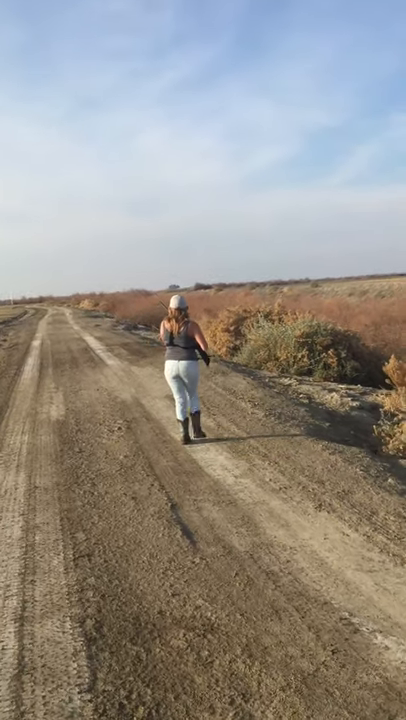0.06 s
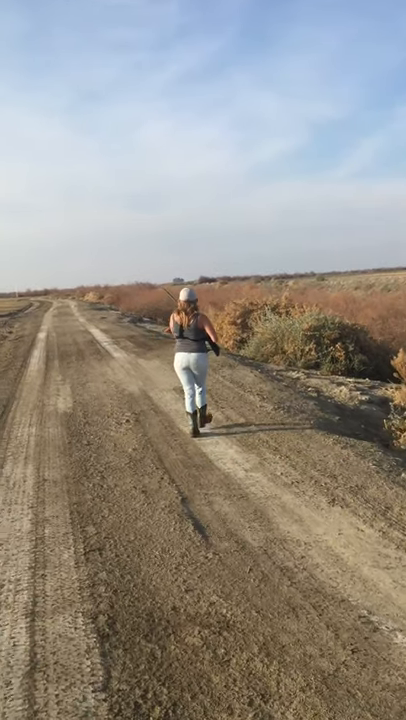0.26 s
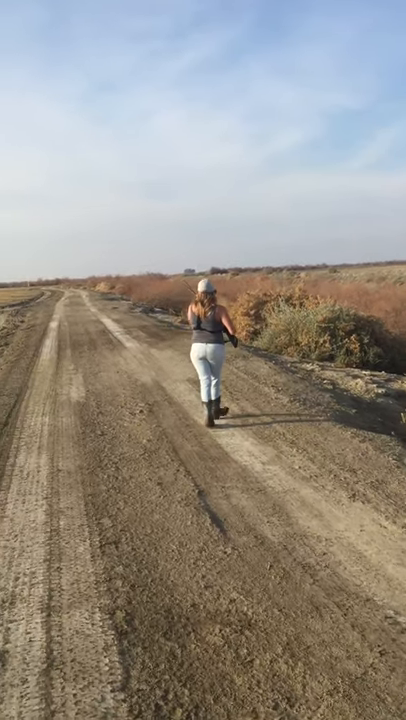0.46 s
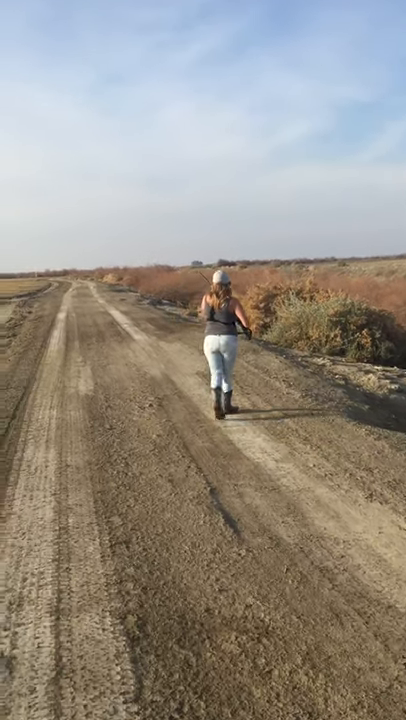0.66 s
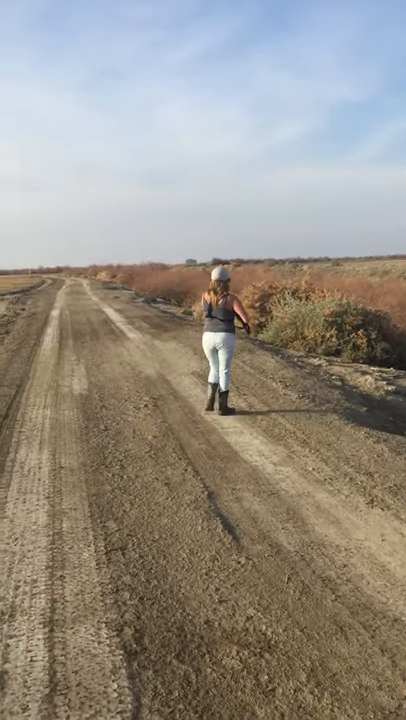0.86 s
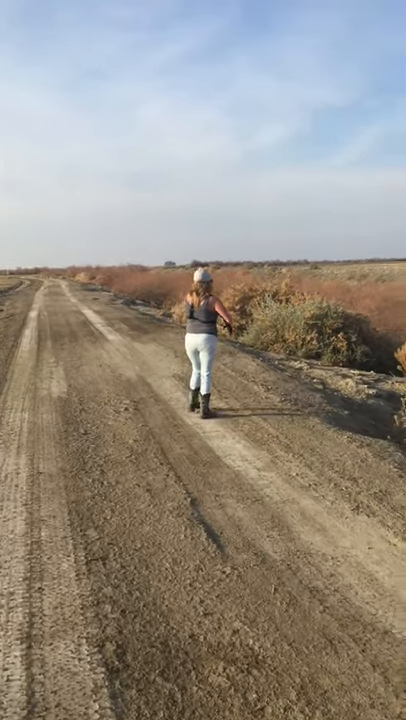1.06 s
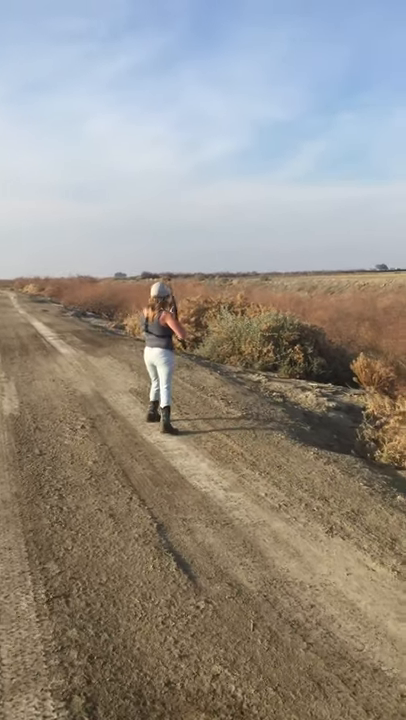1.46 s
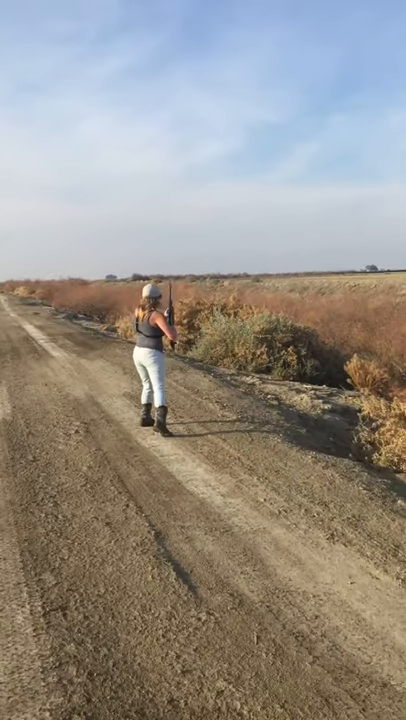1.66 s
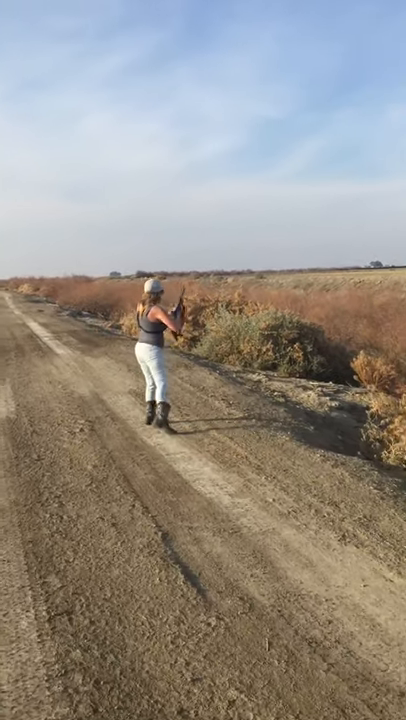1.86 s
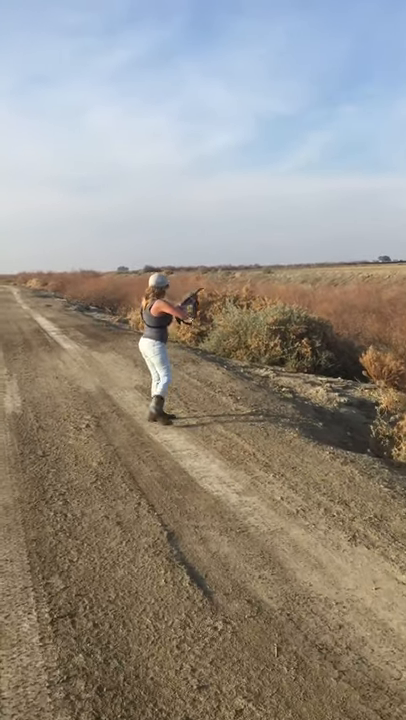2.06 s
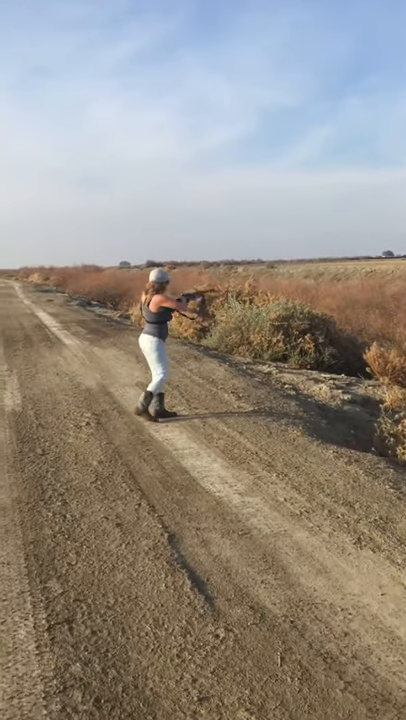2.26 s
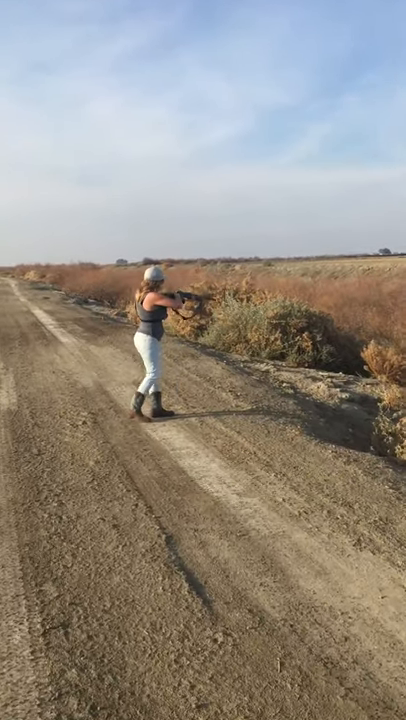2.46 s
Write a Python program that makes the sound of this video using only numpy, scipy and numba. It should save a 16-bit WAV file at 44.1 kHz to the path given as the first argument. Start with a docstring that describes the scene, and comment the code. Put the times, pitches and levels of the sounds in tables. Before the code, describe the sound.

Wind rumbles on a hand-held microphone outdoors, building quickly and buffeting hardest with low pops from about 0.2 to 0.6 seconds. It eases, thumps again near 1.2 seconds, then sinks to a soft low flutter until the end. Faint boot scuffs on dirt and dull handling rustles lie underneath in a quiet steady hiss, with light clicks around 1.0, 1.3 and 2.2 seconds.

```python
"""Wind on a hand-held microphone

On a dirt track in open country one gust rumbles and buffets the microphone's port, then sinks to a
low flutter; the harder it blows, the finer its eddies and the brighter the sound. Faint scuffs of
boots, dull handling rustles, a few light clicks and one far chirp sit in a steady hiss."""
import sys
import numpy as np
from scipy import signal
from scipy.fft import rfft, irfft
from scipy.io import wavfile
from scipy.ndimage import uniform_filter1d
from numba import njit

SR = 44100
rng = np.random.default_rng(int(sys.argv[2]) if len(sys.argv) > 2 else 0)


def wav_record(signal):
    """Record a signal, one row per channel, as 16-bit PCM in the file named by sys.argv[1]."""
    frames = np.transpose(np.atleast_2d(signal))
    bounded = np.clip(frames, -1, 1)
    # unit amplitude maps onto the largest positive 16-bit level
    quanta = np.round(bounded * 32767).astype(np.int16)
    wavfile.write(sys.argv[1], SR, quanta)


N = 114660


def undb(db):
    """Amplitude ratio of a level in decibels."""
    return 10 ** (np.asarray(db) / 20)


def unit(x):
    """Normalisation to rms 1."""
    return x / np.sqrt(np.mean(x ** 2))


def smooth(x, seconds):
    """Two running means in cascade form a triangular window."""
    size = max(int(seconds * SR), 1)
    return uniform_filter1d(uniform_filter1d(x, size), size)


@njit
def lowpass(x, hz):
    """Two integrators in a feedback loop form a low-pass whose corner can move every sample."""
    y, band_state, low_state = np.empty(len(x)), 0., 0.
    for i in range(len(x)):
        gain = np.tan(np.pi * hz[i] / SR)
        band = (band_state + gain * (x[i] - low_state)) / (1 + gain * (gain + np.sqrt(2.)))
        y[i] = low_state + gain * band
        band_state, low_state = 2 * band - band_state, 2 * y[i] - low_state
    return y


def band_noise(hz, octaves):
    """Band-limited noise centred on hz, rms 1."""
    edges = np.minimum(hz * 2 ** (np.array([-.5, .5]) * octaves), SR / 2 - 100)
    band = signal.butter(2, edges, "band", fs=SR, output="sos")
    return unit(signal.sosfilt(band, rng.standard_normal(N)))


def hiss():
    """Open air and the microphone set a floor of stationary broadband noise."""
    # Spectrum of the hiss. Each row: frequency in Hz, relative spectral density in dB.
    spectrum = [(30, -14.5), (120, 7), (300, 0.5), (600, -4), (1300, -7), (2200, -8.5), (4300, -11.5),
                (4950, -16), (5450, -12.5), (7600, -17), (8900, -16), (9900, -18.5), (10400, -23),
                (11200, -18.5), (15500, -22.5)]
    hz, db = np.array(spectrum).T
    bin_hz = np.maximum(np.fft.rfftfreq(N, 1 / SR), 1)
    gain = undb(np.interp(np.log(bin_hz), np.log(hz), db))
    noise = irfft(rfft(rng.standard_normal(N)) * gain, N)
    return undb(-69) * unit(noise)


def chirp(t):
    """Narrow-band noise is heard as one raspy note, perhaps a far bird."""
    peak_s, half_length_s = 1.805, 0.042
    swell = np.exp(-((t - peak_s) / half_length_s) ** 2)
    return undb(-72.5) * swell * band_noise(hz=1690, octaves=0.11)


def scuffs_and_rustles(t):
    """Boot scuffs and dull handling rustles: soft swells of noise, flickering by amplitude modulation."""
    # Scuffs, and rustles in the two low-pitched rows.
    # Each row: centre time in seconds, half-length in seconds, level in dB, centre frequency in Hz.
    swells = [(0.274, 0.026, -72.5, 1204), (0.602, 0.02, -67, 1160), (0.608, 0.017, -73.5, 2470),
              (0.659, 0.025, -74, 3400), (0.662, .03, -71, 1070), (0.853, 0.26, -81, 2620),
              (1.023, 0.084, -70, 250), (1.34, 0.016, -72, 2140), (2.09, .02, -70.5, 277),
              (2.163, 0.033, -74, 2310)]
    flicker_db = 2.5
    out = np.zeros(N)
    for at, half_length, db, hz in swells:
        noise = band_noise(hz, octaves=1)
        flicker = unit(smooth(rng.standard_normal(N), seconds=0.0017))
        texture = unit(noise * undb(flicker_db * flicker))
        swell = np.exp(-((t - at) / half_length) ** 2)
        out += undb(db) * swell * texture
    return out


def clicks(t):
    """Each light impact of handling excites a snap of noise and a damped vibration."""
    # Handling contacts. Each row: start in seconds, peak in dB, pitch in Hz, decay time in seconds.
    impacts = [(1.021, -57.5, 850, .006), (1.088, -60, 900, 0.0046), (1.314, -52, 873, 0.0051),
               (1.322, -56.5, 190, 0.011), (1.315, -59.5, 3500, 0.0055), (1.338, -65.5, 1060, 0.0017),
               (2.2, -51.5, 1390, .004), (2.25, -62, 5640, 0.005), (2.358, -65.5, 8600, 0.004)]
    attack_s, ring_gain = .0025, 0.88
    out = np.zeros(N)
    for at, db, hz, decay in impacts:
        age = np.maximum(t - at, 0)
        snap = band_noise(hz, octaves=0.76)
        ring = ring_gain * np.sin(2 * np.pi * hz * age)
        envelope = np.minimum(age / attack_s, 1) * np.exp(-age / decay)
        click = envelope * (snap + ring)
        out += undb(db) * click / np.abs(click).max()
    return out


def port(pressure):
    """The port is a damped bass resonator that passes only a low band of the wind's pressure."""
    low_hz, top_hz = 34, 686
    ring_hz, ring_q = 54.3, 0.87
    low_cut = signal.butter(5, low_hz, "high", fs=SR, output="sos")
    top_cut = signal.butter(7, top_hz, fs=SR, output="sos")
    omega = 2 * np.pi * ring_hz
    resonance = signal.tf2sos(*signal.bilinear([1, 0, 0], [1, omega / ring_q, omega ** 2], SR))
    return signal.sosfilt(np.vstack([low_cut, resonance, top_cut]), pressure)


def buffets(t):
    """A passing eddy is a bipolar pressure pulse, push then pull: a puff when long, a pop when short."""
    # Eddies striking the port. Each row: centre time in seconds, peak in dB, half-length in milliseconds.
    strikes = [(0.127, -42, 2.95), (0.183, -38, 2), (.241, -20.5, 2.43), (.2605, -25, 1.09),
               (.2615, -30.5, 1.22), (0.359, -27, 10), (0.3933, -22, 0.56), (.396, -23.5, 1.6),
               (0.412, -31.5, 0.71), (0.426, -19.5, 2.13), (0.4327, -31.5, 0.38), (.4425, -19, 0.79),
               (0.467, -28.5, 1.86), (0.485, -41.5, 1.03), (0.552, -25.5, 0.58), (0.555, -15, 1.85),
               (0.569, -27.5, 4.8), (0.6, -37.5, 5.7), (.657, -47, 1.7), (0.891, -48, 2.1),
               (.944, -39.5, 1.76), (1.035, -40.5, 4.2), (1.111, -42.5, 3.6), (1.158, -29, 2.94),
               (1.1735, -23, 2.16), (1.183, -28.5, 4.3), (1.507, -45, 4.6), (1.564, -54.5, 6.1),
               (1.615, -51, 1.8), (1.733, -43.5, 6.5), (1.805, -44.5, 5.5), (1.896, -47, 6.9),
               (1.941, -50, 5.9), (1.982, -36.5, 7.1), (2.048, -46, 5.2), (2.119, -44.5, 4.8),
               (2.156, -39, 5.3), (2.183, -38, 5.9), (2.23, -42, 3.84), (2.313, -38.5, 6.6),
               (2.377, -40, 4.46), (2.422, -46.5, 3.2), (2.482, -51, 2.67), (2.527, -37, 3.12),
               (2.571, -41.5, 4.2)]
    out = np.zeros(N)
    for at, db, half_ms in strikes:
        near = np.abs(t - at) < .2
        passage = (t[near] - at) * 1000 / half_ms
        pulse = -passage * np.exp(-passage ** 2)
        thump = port(pulse + 1e-18)  # the offset prevents underflow in the filters
        out[near] += undb(db) * thump / np.abs(thump).max()
    return out


def eddies(corner_hz):
    """Turbulent pressure falls off steeply above a corner frequency; partly evened out, rms 1."""
    steadiness = 0.51  # 0 leaves the swings in level, 1 flattens them
    turbulence = lowpass(lowpass(rng.standard_normal(N), corner_hz), corner_hz)
    pressure = unit(port(turbulence))
    local_power = smooth(pressure ** 2, seconds=0.038) + 1e-9
    return unit(pressure / local_power ** (steadiness / 2))


def wind(t):
    """Faster flow drives turbulence to smaller scales: large eddies rumble, fine ones join the gust."""
    # Strength of the wind at the port. Each row: time in seconds, level of the large eddies in dB.
    gust = [(0, -51.5), (.11, -50), (.16, -42), (.205, -43), (.245, -29.5), (.29, -38), (.36, -33),
            (.455, -31), (.5, -38), (.545, -38.5), (.595, -36.5), (.635, -58.5), (.7, -44.5), (.78, -53.5),
            (.91, -40.5), (.98, -58), (1.14, -49.5), (1.23, -51.5), (1.3, -77.5), (1.49, -64.5),
            (1.56, -62), (1.68, -64), (1.8, -53), (1.95, -56), (2.08, -68), (2.19, -46), (2.28, -59),
            (2.45, -56.5), (2.6, -67)]
    calm_db, calm_hz, db_per_octave = -44.5, 66, 10
    fine_calm_db, fine_db_per_db, fine_hz_ratio = -22.5, 0.31, 1.72  # relative to the large eddies
    db = np.interp(t, *np.array(gust).T)
    rise_db = np.maximum(db - calm_db, 0)
    corner_hz = calm_hz * 2 ** (rise_db / db_per_octave)
    large = eddies(corner_hz)
    fine = undb(fine_calm_db + fine_db_per_db * rise_db) * eddies(fine_hz_ratio * corner_hz)
    return undb(db) * (large + fine)


def scene():
    """The pressures of all sources add by superposition in one channel."""
    t = np.arange(N) / SR
    return (wind(t) + buffets(t) + hiss() + scuffs_and_rustles(t) + clicks(t) + chirp(t))[None]


def record(dry):
    """A steep elliptic low-pass limits the bandwidth."""
    top_hz = 15700
    top_cut = signal.ellip(12, rp=.1, rs=70, Wn=top_hz, fs=SR, output="sos")
    return signal.sosfilt(top_cut, dry)


dry = scene()
out = record(dry)
wav_record(out)
```